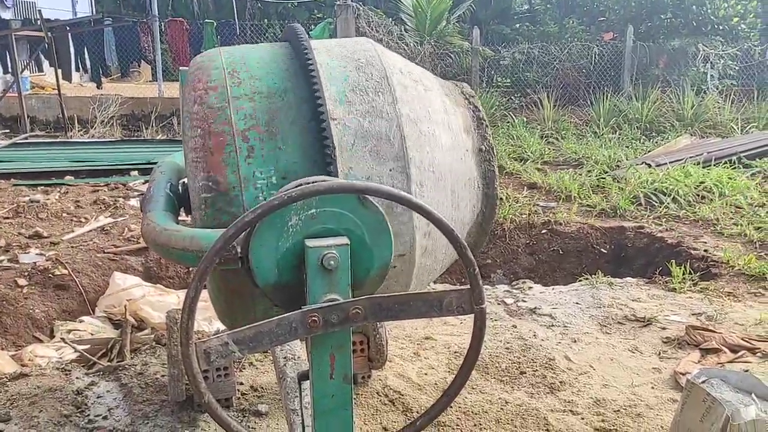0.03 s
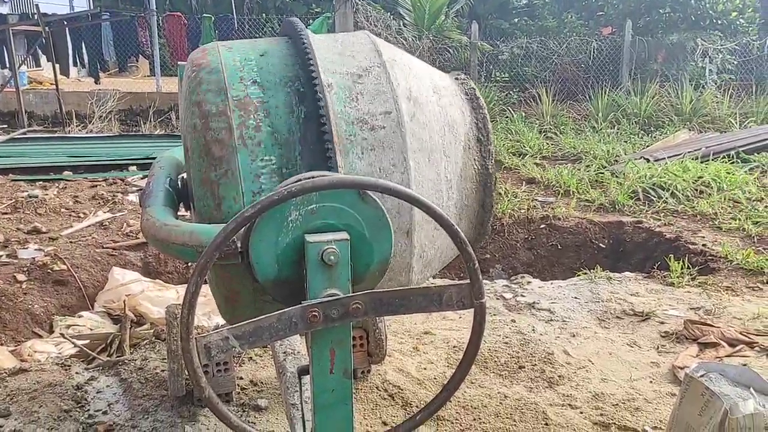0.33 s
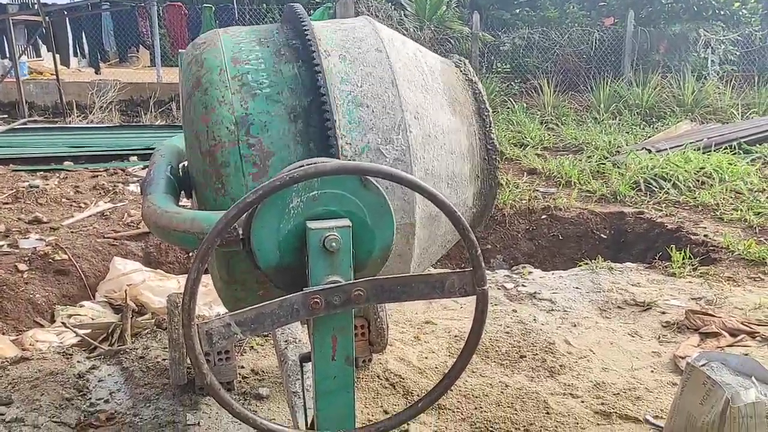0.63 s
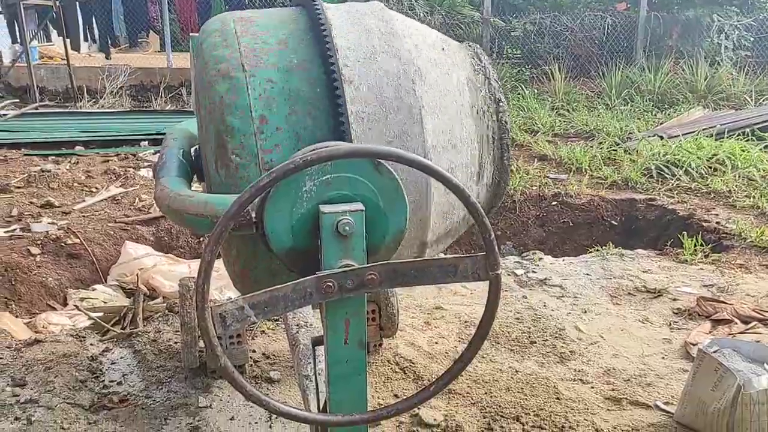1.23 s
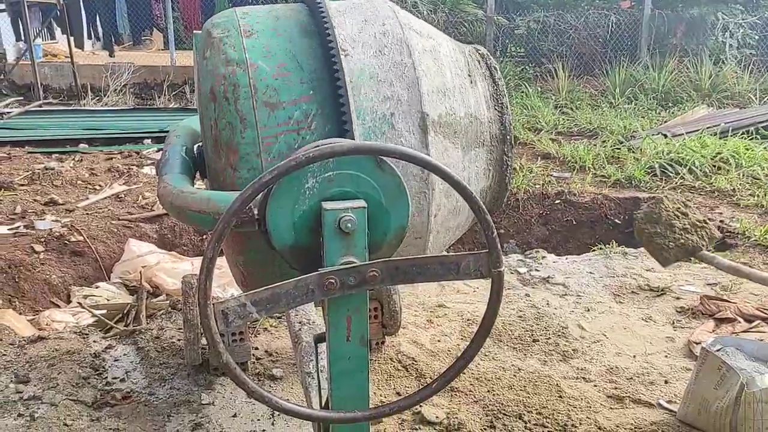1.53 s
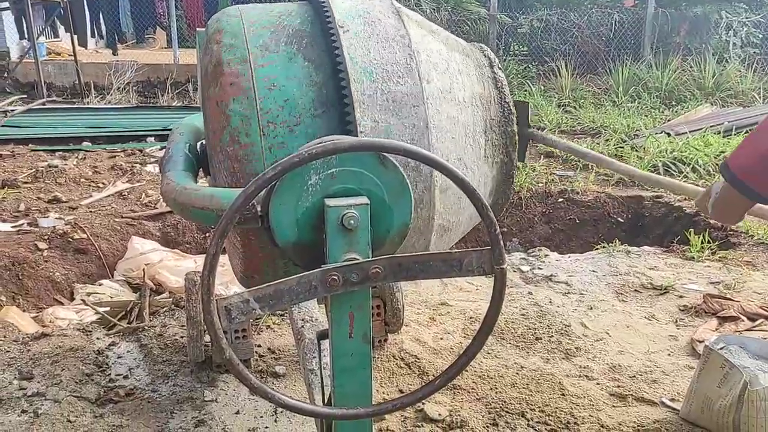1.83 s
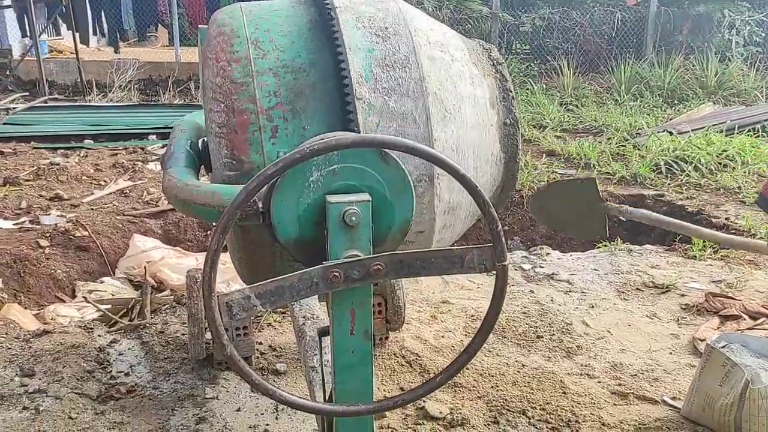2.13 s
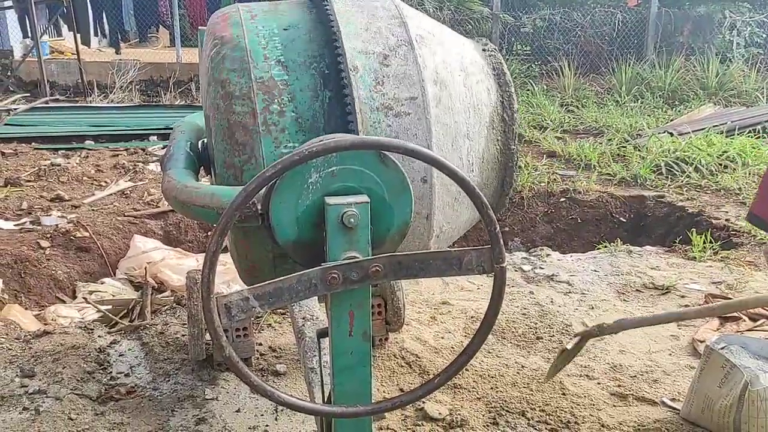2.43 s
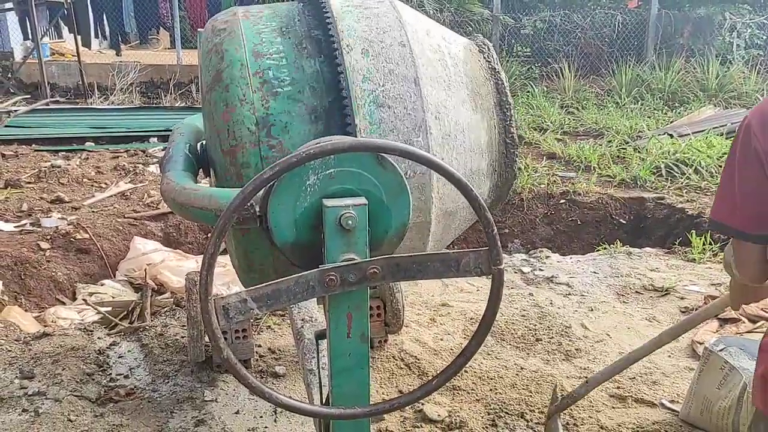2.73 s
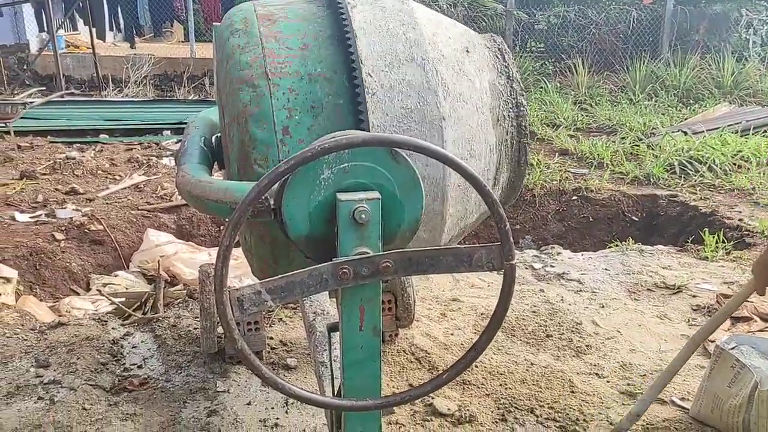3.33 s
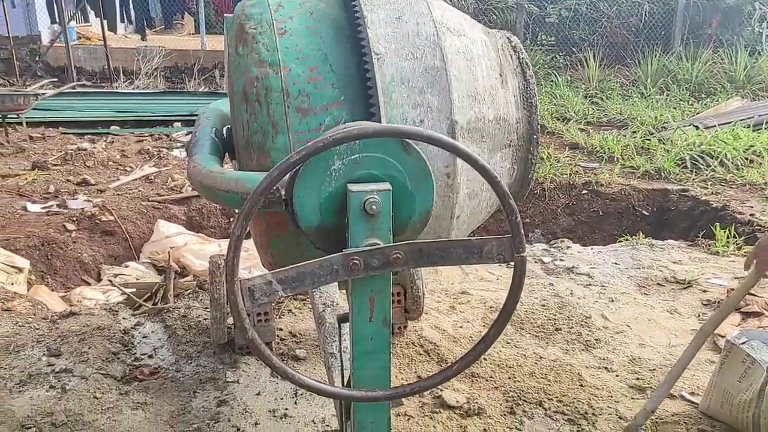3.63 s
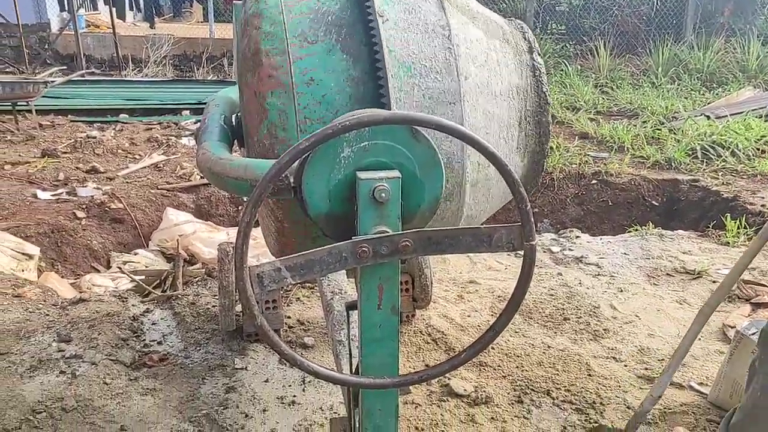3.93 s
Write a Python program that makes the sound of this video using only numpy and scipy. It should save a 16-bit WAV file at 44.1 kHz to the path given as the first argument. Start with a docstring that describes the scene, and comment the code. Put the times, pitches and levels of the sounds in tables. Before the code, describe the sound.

A concrete mixer runs outdoors, its motor humming and rattling while the steel drum throbs. Wet mix churns and hisses, grit spatters and a few stones knock. A thin chirp passes late. Nearly everything is on the right.

```python
"""A concrete mixer outdoors

The motor hums and rattles the drive once a turn; the worn gear makes the steel drum throb and ring.
The wet mix churns and hisses, grit spatters and stones knock on the wall; a thin chirp passes late.
The right microphone carries it all, with a sharp ring in the treble; the left one is almost dead."""
import sys
import numpy as np
from scipy import signal
from scipy.fft import rfft, irfft, next_fast_len
from scipy.io import wavfile
from scipy.ndimage import uniform_filter1d, map_coordinates

SR = 44100
rng = np.random.default_rng(int(sys.argv[2]) if len(sys.argv) > 2 else 0)


def dump_mix(stems):
    """Bounce the given channels to the path in sys.argv[1] as a 16-bit WAV at rate SR."""
    frames = np.atleast_2d(stems).T  # one column per channel
    limited = np.clip(frames, -1, 1)  # hard clip at full scale
    pcm = np.round(limited * 32767).astype(np.int16)
    wavfile.write(sys.argv[1], SR, pcm)


N = 176400

# how fast the motor turns: t/s, f/Hz
MOTOR_SPEED = [(0, 62.8), (.31, 63.1), (.62, 62.55), (.92, 63.45), (1.23, 63.05), (1.85, 63.1),
               (2.15, 62.55), (2.46, 63.0), (2.77, 62.3), (3.08, 63.4), (3.38, 63.1), (4, 63.6)]
# the load, which rises as the drum lifts the mix: t/s, level/dB
MOTOR_LOAD = [(0, 2.5), (.33, 5.5), (.7, -0.5), (.95, -0.5), (1.25, -3.5), (1.6, -0.5), (1.85, -6.5),
              (2.15, 0), (2.48, 4.5), (2.8, 0), (3.05, 2), (3.5, -4.5), (4, -3.5)]
# hum tones: multiple of the speed, level/dB, dB per dB of load, swell/dB, swell lead/pinion turns
HUM_TONES = [(1, -51, 0.74, -0.5, 0.3), (2, -46, 0.73, 2, -0.087), (3, -39, 0.24, 2.5, 0.19),
             (4, -39, 0.88, 0.5, -0.0083), (5, -54.5, 2, -1, 0.12), (6, -62, 1.4, -0.5, .07)]
# force on the gear teeth: position/pinion turns, level/dB
TOOTH_FORCE = [(.09, 3.5), (.22, -1), (.33, -2.5), (.42, -6.5), (.55, .6), (.67, -.7), (.74, 2.3),
               (.83, -.8), (.95, 1.5)]
# pitches at which the drum rings: f/Hz, half width/Hz, level/dB
DRUM_MODES = [(73, 5.6, -14), (101, 2, -14.5), (149.2, 7.2, 0), (173.6, 15, -4.5), (199.7, 10.3, -5.5),
              (247, 21, -0.5), (273, 4.2, -5), (275.2, 6.1, 3), (301, 21, -6), (312.4, 10.6, -5),
              (341, 8.4, -12), (365.5, 19, -13), (484, 14.7, -8.5), (616, 5.4, -11.5)]

# loudness of the churning: t/s, level/dB
CHURN_LEVEL = [(0, -40.5), (.33, -36.5), (.5, -39), (.65, -42), (.72, -38), (.85, -40.5), (1.05, -44),
               (1.35, -44), (1.6, -44.5), (1.7, -40), (1.8, -43), (1.97, -43), (2.08, -38.5), (2.24, -40.5),
               (2.43, -36.5), (2.56, -39), (2.64, -37.5), (2.76, -41.5), (3.02, -38), (3.3, -45.5),
               (3.6, -47), (4, -45.5)]
# its tone colour: f/Hz, level/dB
CHURN_COLOUR = [(25, -24), (100, -18), (200, -13.5), (400, -4.5), (520, -3), (620, -2.5), (740, 0),
                (880, -5.5), (1030, -10.5), (1350, -8.5), (2500, -17.5), (6000, -44.5)]

# loudness of the whole rattle: t/s, level/dB
RATTLE_LEVEL = [(0, -38), (.18, -34.5), (.28, -36.5), (.38, -38.5), (.58, -39.5), (.72, -38), (.85, -36.5),
                (.98, -41.5), (1.08, -41.5), (1.3, -42), (1.5, -42.5), (1.68, -42.5), (1.8, -54),
                (1.88, -44.5), (2.01, -45), (2.08, -38), (2.16, -38.5), (2.22, -41), (2.29, -37),
                (2.46, -37), (2.54, -44.5), (2.62, -38), (2.72, -42), (2.79, -38.5), (2.89, -39), (3, -38),
                (3.19, -44), (3.32, -41.5), (3.48, -46), (3.62, -44), (3.73, -45.5), (3.83, -44),
                (3.9, -47.5), (4, -51.5)]
# tone colour of its dry clatter: f/Hz, level/dB
CLATTER_COLOUR = [(400, -19.5), (950, -6), (1350, 2.5), (1750, 0), (2150, -5.5), (2600, -4), (3200, -9.5),
                  (4500, -13), (7000, -17.5), (14000, -73)]
# pitches at which the drive parts ring: f/Hz, width/Hz, level/dB
DRIVE_MODES = [(938.5, 9.4, 1.5), (1104, 17, 5), (1374, 19, -1.5), (1487, 11.8, 11.5), (1710, 42, 6),
               (1805, 17, 7), (1886, 42, 6)]
# that ring compared with the dry clatter: t/s, level/dB
DRIVE_RING_LEVEL = [(0, 1.5), (.2, 2), (.6, 0.5), (.85, 1), (1.1, -3), (2.1, -1.5), (2.4, -0.5),
                    (2.72, -0.5), (2.95, -1), (4, 0)]
# pitches at which the gear rim rings: f/Hz, width/Hz, level/dB
RIM_MODES = [(1970, 49, -4.5), (2122, 34, 3.5), (2208, 47, -3.5), (2397, 29, -1.5), (2585, 155, -10)]
# bright ticks compared with the rattle: t/s, level/dB
TICK_LEVEL = [(0, -7.5), (.3, -5), (.6, -15), (1.3, -8), (1.9, -5.5), (2.4, -5.5), (2.7, -8), (4, -9)]
# their tone colour: f/Hz, level/dB
TICK_COLOUR = [(2000, -28), (3200, -20), (5000, -18), (6500, -6.5), (7700, 4), (8600, -9), (10000, -32),
               (14000, -54)]

# loudness of the sliding mix's hiss: t/s, level/dB
HISS_LEVEL = [(0, -39.5), (.3, -38), (.48, -36), (.62, -40.5), (.95, -38.5), (1.25, -43.5), (1.55, -40),
              (1.75, -39), (1.95, -41), (2.2, -40.5), (2.46, -39), (2.72, -41.5), (3.13, -36.5),
              (3.45, -42), (3.65, -40), (4, -40)]
# its tone colour: f/Hz, level/dB
HISS_COLOUR = [(1500, -39), (3200, -20.5), (5000, -18), (6200, -13.5), (7000, -6.5), (7700, 0), (8400, -7),
               (9200, -15.5), (10200, -29), (12000, -38), (14000, -48), (15000, -55)]
# loudness of the fine grit's fizz: t/s, level/dB
FIZZ_LEVEL = [(0, -69), (.3, -54), (.47, -54), (.7, -62), (1.05, -55), (1.3, -64), (1.7, -52), (1.9, -61),
              (2.15, -58), (2.33, -74), (2.5, -55), (2.75, -64), (3.1, -53), (3.4, -61), (3.75, -56),
              (4, -57)]
# its tone colour: f/Hz, level/dB
FIZZ_COLOUR = [(6000, -28), (9000, 7), (10500, -3), (12000, -6.5), (14000, -10.5), (15000, -26)]

# spatters of grit: t/s, level/dB, time to fade by 60 dB/s
GRIT_HITS = [(0.3755, -19, 0.014), (0.3854, -19.5, 0.031), (0.392, -29.5, 0.063), (0.407, -26, 0.1),
             (.438, -35, 0.13), (.92, -34.5, 0.13), (.937, -36, 0.088), (2.49, -29, 0.055)]
# their tone colour: f/Hz, level/dB
GRIT_COLOUR = [(2000, -13), (5000, -9.5), (6800, -6.5), (7700, 7.5), (8600, -1.5), (10000, -16),
               (14500, -27)]
# knocks on the drum wall: t/s, level/dB
WALL_HITS = [(1.653, -38), (1.705, -39.5), (2.048, -27.5), (2.496, -26.5)]
# pitches at which the struck wall rings: f/Hz, level/dB, time to fade by 60 dB/s
WALL_MODES = [(550, -2, 0.09), (623, 0.5, 0.072), (700, -2, .13), (756, -0.5, 0.075), (945, -11.5, 0.15),
              (1395, -14, 0.16)]
# path of the chirp: t/s, f/Hz, level/dB
CHIRP_PATH = [(3.515, 7150, -60), (3.53, 7480, -41), (3.554, 7570, -33.5), (3.567, 7280, -37),
              (3.578, 6820, -44), (3.597, 6300, -50), (3.61, 6200, -70)]
# tone colour of the dead microphone's noise: f/Hz, level/dB
DEAD_MIC_COLOUR = [(20, -0.5), (45, -3), (100, -16.5), (250, -11.5), (500, -17), (1000, -23), (2200, -28.5),
                   (4500, -41), (9000, -45), (13000, -57), (15000, -75)]

PINION_RATIO = 15  # motor turns per turn of the pinion, the small gear that drives the drum


def amp(db):
    """Turn decibels into a gain."""
    return 10 ** (np.asarray(db) / 20)


def unit(x):
    """Scale x to an average strength (rms) of 1."""
    return x / np.sqrt(np.mean(x ** 2) + 1e-20)


def curves(rows):
    """Join a table's points: one curve for each column after the time."""
    times, *columns = np.transpose(rows)
    return [np.interp(np.arange(N) / SR, times, column) for column in columns]


def wobble(rate):
    """A smooth curve through `rate` random points a second."""
    return map_coordinates(rng.standard_normal(int(N * rate / SR) + 4), [np.arange(N) * rate / SR])


def filtered(x, response):
    """Multiply each frequency in x by response(hz)."""
    size = next_fast_len(N + SR // 2)
    return irfft(rfft(x, size) * response(np.fft.rfftfreq(size, 1 / SR)), size)[:N]


def coloured(x, colour):
    """Give x the tone colour in a table."""
    f, db = np.transpose(colour)
    return filtered(x, lambda hz: amp(np.interp(np.log(hz + 1), np.log(f), db)))


def resonant(x, modes):
    """Let x ring at the pitches in a table."""
    return unit(filtered(x, lambda f: sum(
        (-1) ** k * amp(db) * 1j * f * width / (hz * hz - f * f + 1j * f * width)
        for k, (hz, width, db) in enumerate(modes))))


def steadied(x, samples):
    """Even out the loudness of x over that many samples."""
    power = abs(uniform_filter1d(x ** 2, size=samples))
    return unit(x / np.sqrt(power + 1e-20))


def grains(spread_db, rate):
    """Noise with a flickering level, like many tiny impacts."""
    return unit(rng.standard_normal(N) * amp(2 * spread_db * np.tanh(wobble(rate) / 2)))


def shifting(x, patchy_db):
    """Make patches of low and high sound in x come and go at random."""
    spectra = signal.stft(x, nperseg=1024)[2]
    patches = uniform_filter1d(rng.standard_normal(spectra.shape), size=2, axis=0)  # blur in pitch
    patches = uniform_filter1d(patches, size=12, axis=1)  # blur in time
    gain = amp(patchy_db * np.tanh(unit(patches)))
    return unit(signal.istft(spectra * gain, nperseg=1024)[1][:N])


def pinion_swell(turns, lead):
    """The off-centre pinion makes a swell with broad tops and short dips; lead is in pinion turns."""
    angle = 2 * np.pi * (turns / PINION_RATIO + lead)
    return np.cos(angle) + .5 * np.cos(2 * angle - 2.6)


def gear_throb(turns):
    """Force on the worn teeth in dB, the same on every pinion turn."""
    position, db = np.transpose(TOOTH_FORCE)
    return np.interp(turns / PINION_RATIO, position, db, period=1)


def motor(turns, waver_db=0.97):
    """The shaft hums at multiples of its speed; the upper tones throb with the gear."""
    load, = curves(MOTOR_LOAD)
    hum = np.zeros(N)
    for multiple, db, follows, swell_db, lead in HUM_TONES:
        k = round(multiple)
        level = db + follows * load + swell_db * pinion_swell(turns, lead) + waver_db * wobble(11)
        if k >= 4:
            level += gear_throb(turns)
        frame_shift = .25 * k ** 2  # the frame smears the tones over the turn
        hum += amp(level) * np.cos(2 * np.pi * (k * turns + frame_shift))
    return np.sqrt(2) * hum


def drum(turns, gear_share=.6, size=4096):
    """The steel shell drones: the gear shakes it alike on every pinion turn, the mix at random."""
    def shell(f):
        return np.sqrt(sum(amp(db) ** 2 / (1 + ((f - hz) / width) ** 2) ** 2
                           for hz, width, db in DRUM_MODES))

    load, = curves(MOTOR_LOAD)
    pinion_hz = turns[-1] * SR / N / PINION_RATIO
    k = np.arange(size // 2 + 1)
    tones = shell(k * pinion_hz) * (k % PINION_RATIO > 0)  # skip the motor's own tones
    one_turn = irfft(tones * np.exp(2j * np.pi * rng.random(len(k))))
    by_gear = unit(np.interp(turns / PINION_RATIO, np.arange(size) / size, one_turn, period=1))
    by_mix = unit(filtered(rng.standard_normal(N), shell))
    drone = np.sqrt(gear_share) * by_gear + np.sqrt(1 - gear_share) * by_mix
    return amp(-37.5 + 0.5 * load + .7 * gear_throb(turns)) * steadied(drone, samples=2000)


def churn(gain_db=1):
    """Wet concrete tumbles inside the drum."""
    level, = curves(CHURN_LEVEL)
    tumble = coloured(grains(spread_db=1.0, rate=220), CHURN_COLOUR)
    return amp(level + gain_db) * shifting(tumble, patchy_db=2.0)


def strokes(turns, start, rise, fall, steady, scatter_db):
    """One burst a turn, each of its own size, over a steady part; start, rise and fall are in turns."""
    slack = .03 * wobble(40)  # play in the drive makes the timing uneven
    count, part = np.divmod(turns - start + 2 + slack, 1)
    burst = (1 - np.exp(-part / rise)) ** 2 * np.exp(-part / fall)
    sizes = amp(scatter_db * np.tanh(rng.standard_normal(size=400)))
    return unit(steady + (1 - steady) * unit(burst * sizes[count.astype(int)]))


def rattle(turns, gain_db=-1, rim_db=-5.5):
    """Loose drive parts clatter and tick once a turn; the gear rim rings in swells."""
    level, = curves(RATTLE_LEVEL)
    tick_db, = curves(TICK_LEVEL)
    ring_db, = curves(DRIVE_RING_LEVEL)
    beat = strokes(turns, start=.51, rise=.16, fall=.22, steady=.14, scatter_db=1.0)
    blows = grains(spread_db=2.5, rate=560) * beat
    ticks = grains(spread_db=3.5, rate=1100)
    ticks *= strokes(turns, start=.528, rise=.016, fall=.085, steady=.09, scatter_db=2.2)
    ticks = amp(tick_db) * unit(coloured(ticks, TICK_COLOUR))
    ring = amp(ring_db) * steadied(resonant(blows, DRIVE_MODES), samples=1400)
    clatter = shifting(unit(coloured(blows, CLATTER_COLOUR)) + ring, patchy_db=1.4)
    clatter *= amp(.9 * pinion_swell(turns, lead=.04))
    rim = steadied(resonant(grains(spread_db=0, rate=590) * beat, RIM_MODES), samples=1400)
    rim *= amp(rim_db + 3.8 * pinion_swell(turns, lead=.02))
    return amp(level + gain_db) * (clatter + rim + ticks)


def sliding_sand(gain_db=0.17):
    """Sand hisses along the wall; the finest grit fizzes above it."""
    hiss_db, = curves(HISS_LEVEL)
    fizz_db, = curves(FIZZ_LEVEL)
    hiss = shifting(coloured(grains(spread_db=0.5, rate=910), HISS_COLOUR), patchy_db=5.0)
    fizz = unit(coloured(grains(spread_db=2.5, rate=600), FIZZ_COLOUR))
    return amp(hiss_db + gain_db) * hiss + amp(fizz_db) * fizz


def spatters(attack_s=0.0005):
    """Grit lands on the steel in short bright bursts."""
    bursts, t = np.zeros(N), np.arange(SR // 2) / SR
    for start, db, fade_s in GRIT_HITS:
        bursts[round(start * SR):][:len(t)] += amp(db - 60 * t / fade_s) * (1 - np.exp(-t / attack_s))
    return bursts * unit(coloured(rng.standard_normal(N), GRIT_COLOUR))


def knocks(attack_s=0.0015, crack_db=-13, crack_fade_s=0.031):
    """Stones hit the wall with a crack and make it ring briefly."""
    out, t = np.zeros(N), np.arange(SR // 2) / SR
    for start, db in WALL_HITS:
        ring = sum(amp(level - 60 * t / fade_s) * np.sin(2 * np.pi * (hz * t + rng.random()))
                   for hz, level, fade_s in WALL_MODES)
        noise = unit(coloured(rng.standard_normal(N), CHURN_COLOUR))[:len(t)]
        crack = amp(crack_db - 60 * t / crack_fade_s) * noise
        out[round(start * SR):][:len(t)] += amp(db) * (ring + crack) * (1 - np.exp(-t / attack_s))
    return out


def chirp(waver_hz=25):
    """A thin whistle, likely a small bird, rises and falls."""
    hz, level = curves(CHIRP_PATH)
    t = np.arange(N) / SR
    phase = 2 * np.pi * np.cumsum(hz + waver_hz * wobble(300)) / SR
    sounding = (t > CHIRP_PATH[0][0]) * (t < CHIRP_PATH[-1][0])
    return np.sqrt(2) * amp(level) * np.sin(phase) * sounding


def scene(right_db=6, leak_db=-34, leak_cutoff_hz=400):
    """The mixer on the right; on the left, dull noise and a faint muffled trace of it."""
    turns = np.cumsum(curves(MOTOR_SPEED)[0]) / SR  # motor turns so far
    site = motor(turns) + drum(turns) + churn() + rattle(turns) + sliding_sand()
    site += knocks() + spatters() + chirp()
    dead_mic = amp(-56.5 + 3.9 * wobble(17)) * unit(coloured(rng.standard_normal(N), DEAD_MIC_COLOUR))
    leak = filtered(site, lambda hz: amp(leak_db) / (1 + 1j * hz / leak_cutoff_hz))
    return np.array([dead_mic + leak, amp(right_db) * site])


def record(dry):
    """Cut away the very highest treble on both sides."""
    return np.array([filtered(side, lambda hz: hz < 14700) for side in dry])


dry = scene()
out = record(dry)
dump_mix(out)
```